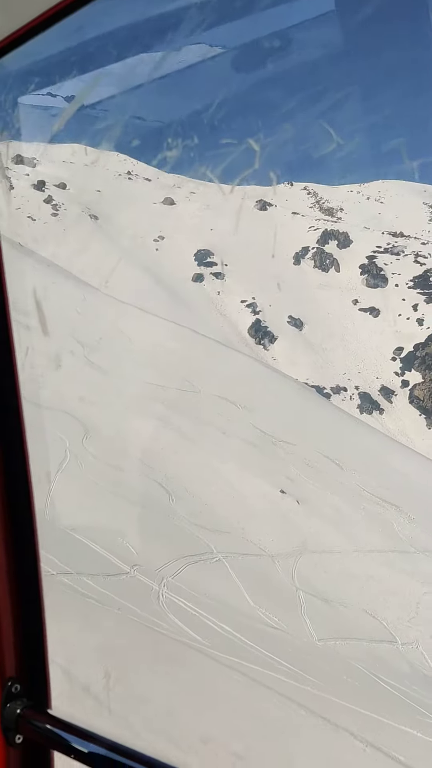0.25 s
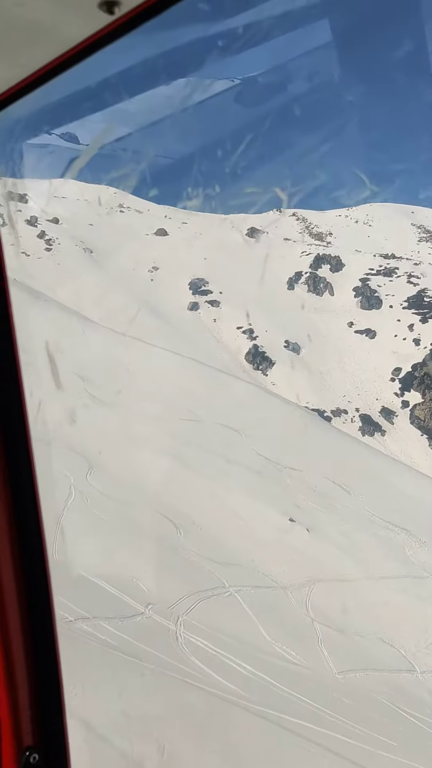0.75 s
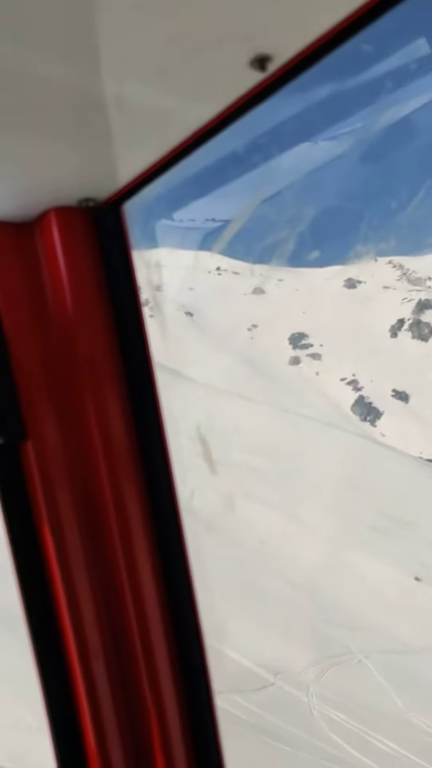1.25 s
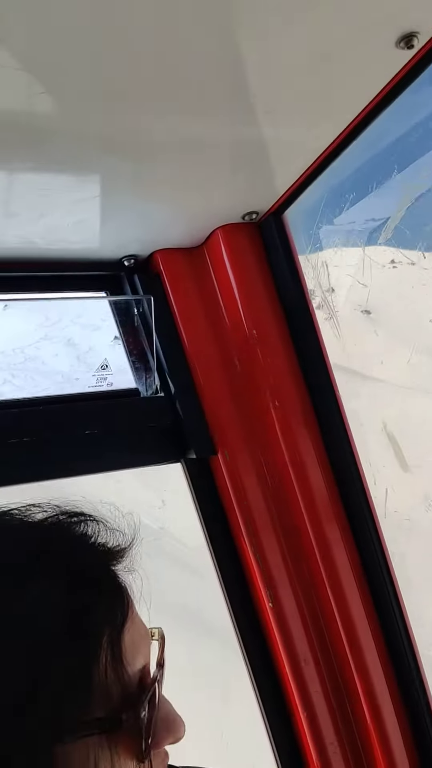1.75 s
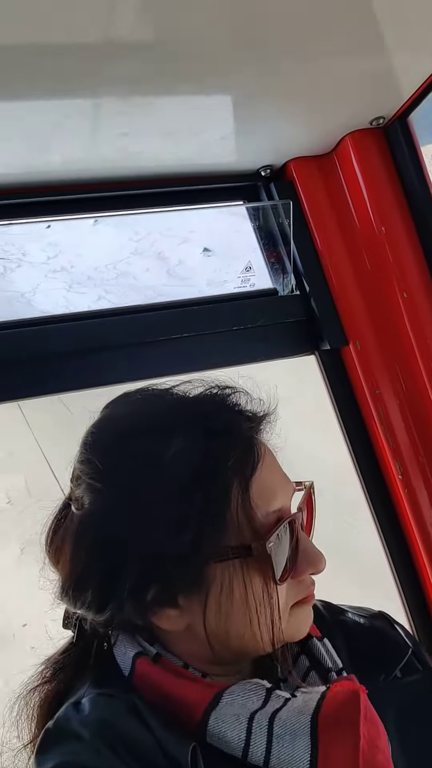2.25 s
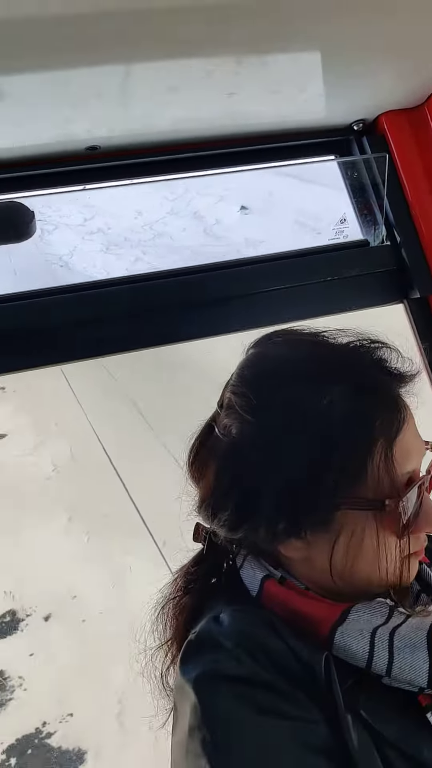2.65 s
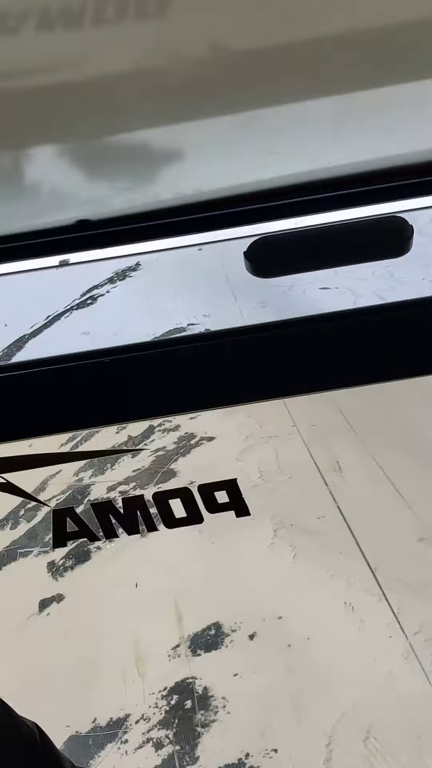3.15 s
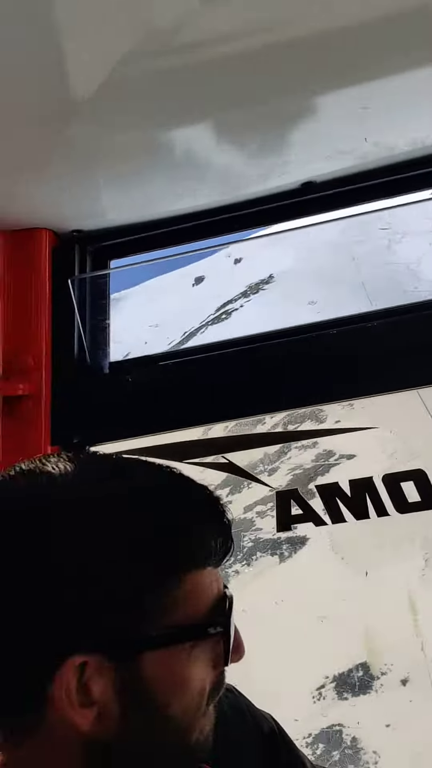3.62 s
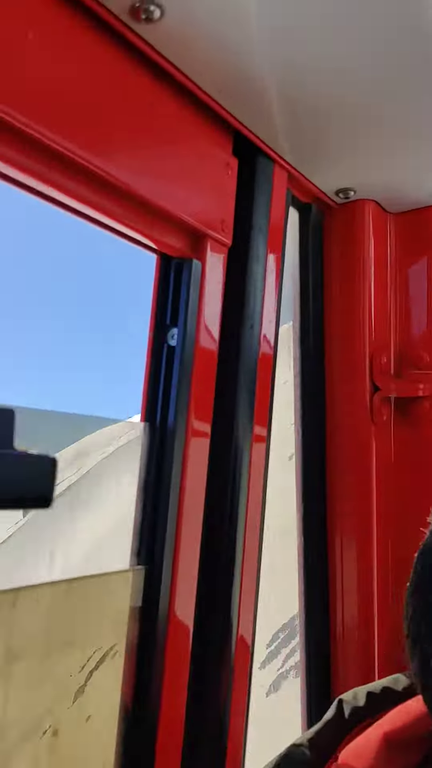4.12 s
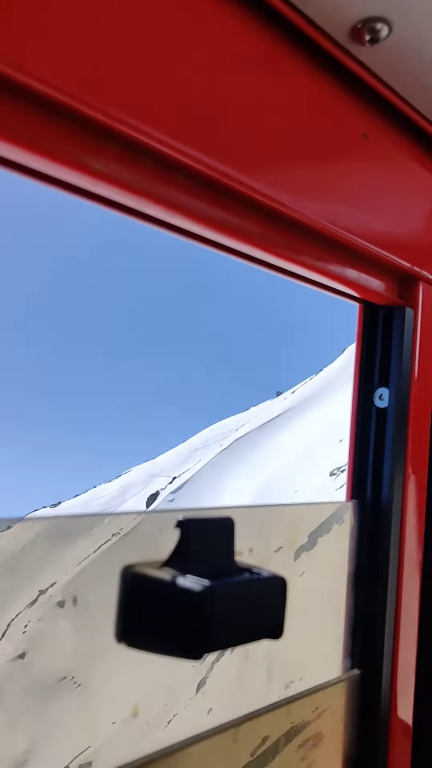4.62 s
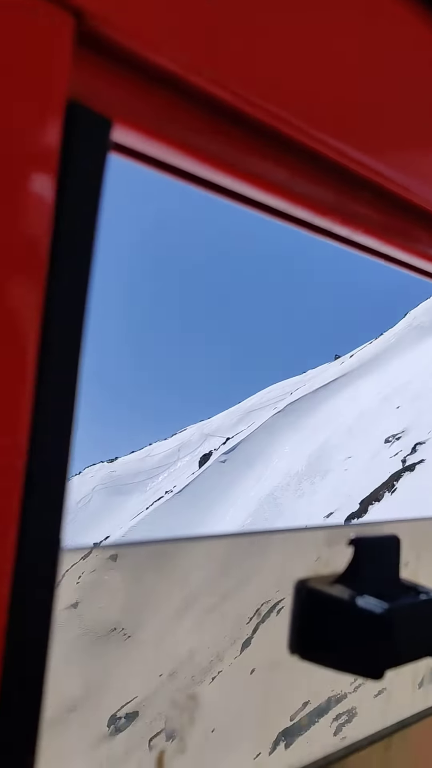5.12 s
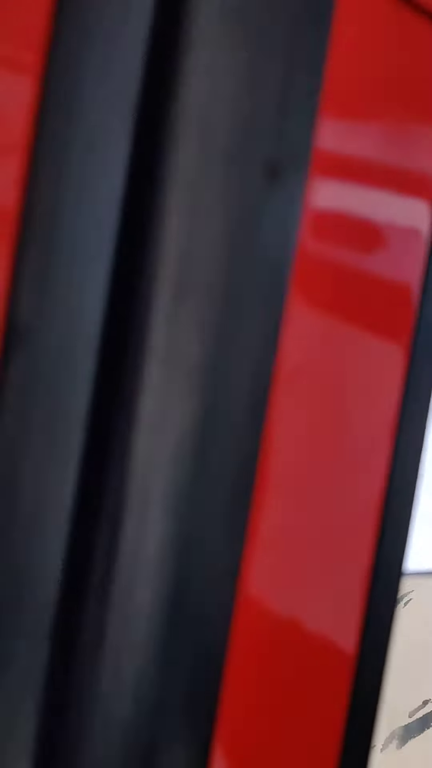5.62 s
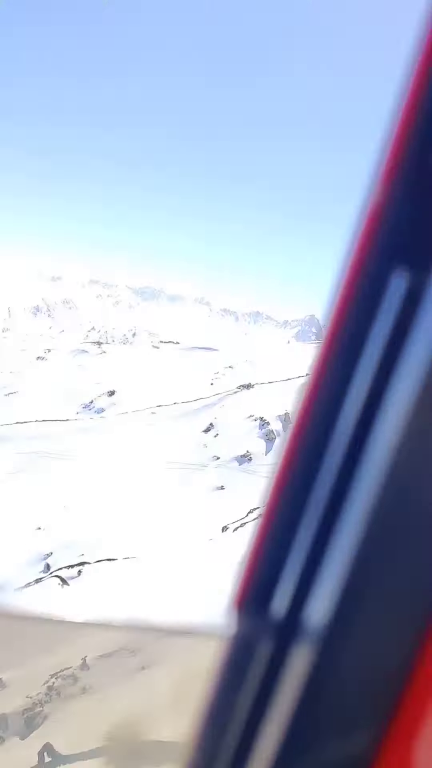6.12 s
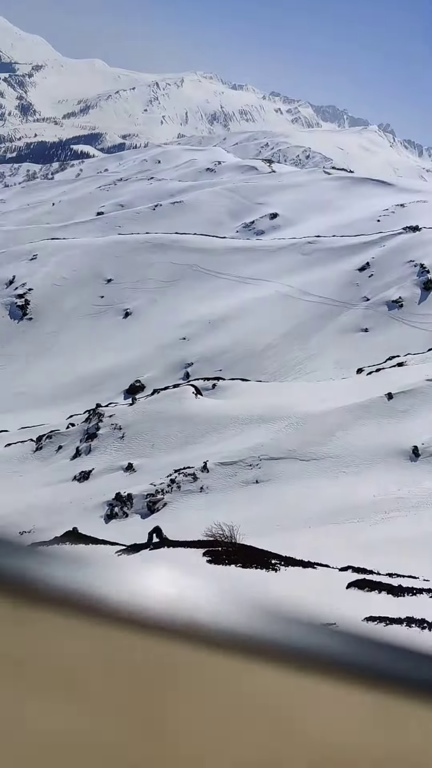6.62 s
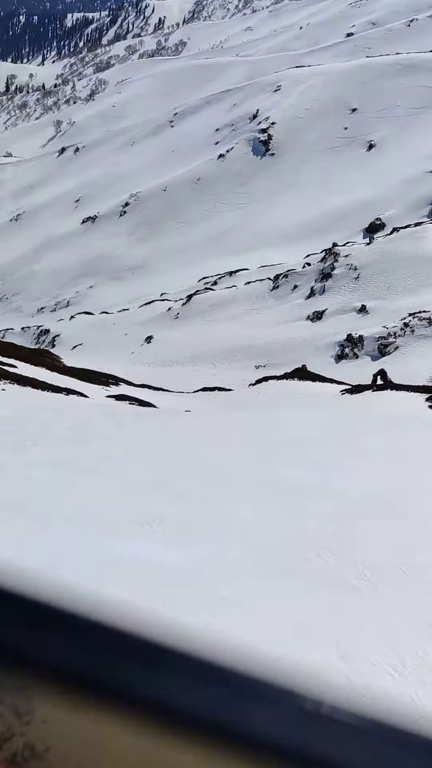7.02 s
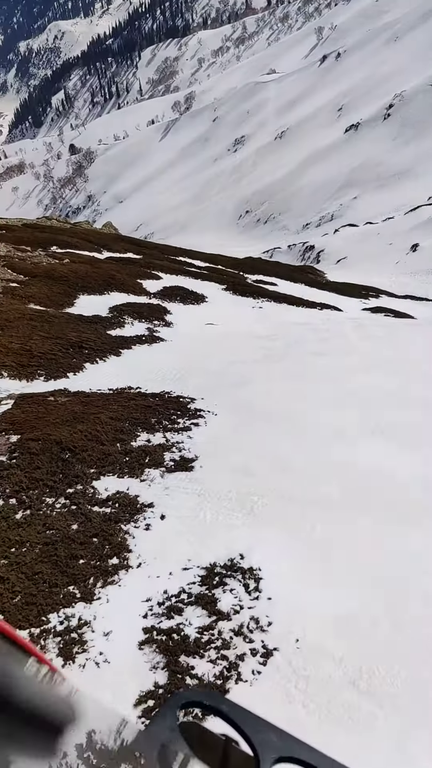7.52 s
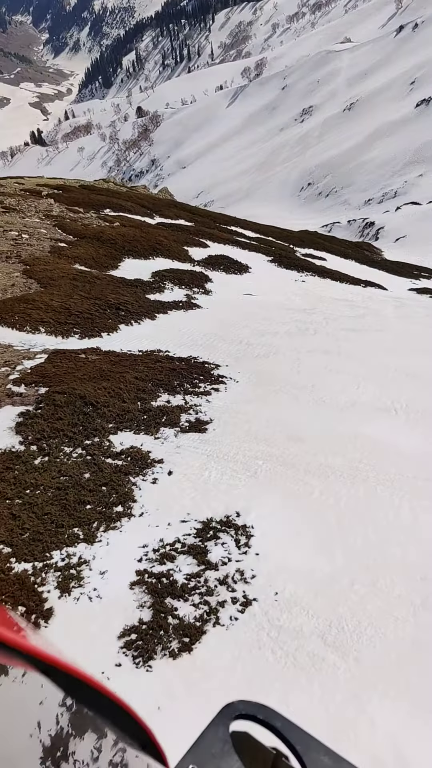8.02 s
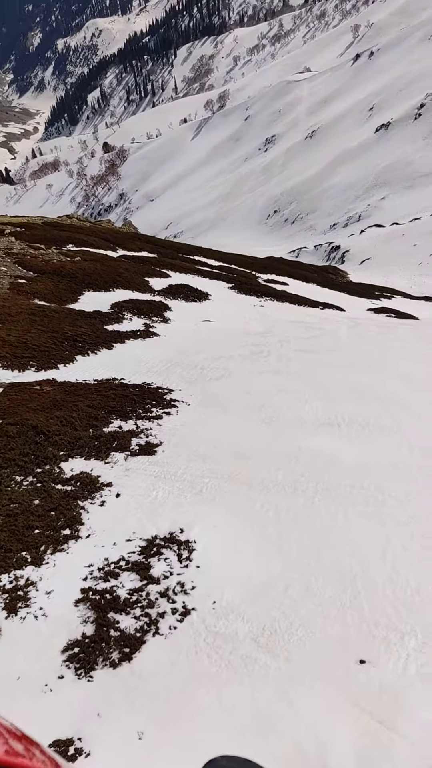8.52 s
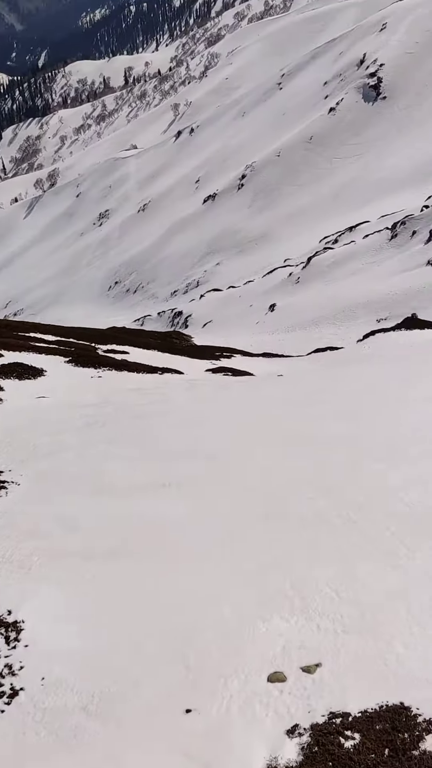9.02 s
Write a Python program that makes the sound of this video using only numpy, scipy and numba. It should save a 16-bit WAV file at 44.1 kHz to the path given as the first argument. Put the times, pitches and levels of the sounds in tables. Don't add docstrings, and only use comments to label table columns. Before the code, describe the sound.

A steady low drone throbs through a small cable car cabin while jackets rustle and tick close by, then wind thumps and a loose pane buzzes.

```python
import sys
import numpy as np
from scipy import signal
from scipy.fft import rfft, irfft, next_fast_len
from scipy.io import wavfile
from scipy.ndimage import uniform_filter1d, minimum_filter1d
from numba import njit

SR = 44100
rng = np.random.default_rng(int(sys.argv[2]) if len(sys.argv) > 2 else 0)


def store_wav(level_fs):
    pcm = np.round(np.clip(np.atleast_2d(level_fs), -1, 1) * 32767)
    wavfile.write(sys.argv[1], SR, pcm.T.astype(np.int16))


def how_loud(loudness_db):
    steps = np.asarray(loudness_db, float) / 20
    return 10 ** steps


N = 408366
T = np.arange(N) / SR
LEFT_RIGHT = np.array([[1], [-1]])


def curve(rows):
    s, *columns = np.transpose(rows)
    return [np.interp(T, s, c) for c in columns]


def slopes(start_s, end_s, rise_db_s, fall_db_s):
    return -rise_db_s * np.maximum(start_s - T, 0) - fall_db_s * np.maximum(T - end_s, 0)


def unit(x):
    return x / np.sqrt(np.mean(x ** 2))


def noise():
    return rng.standard_normal(N)


def colour(x, points):
    size = next_fast_len(N)
    hz, db = np.transpose(points)
    bin_hz = np.arange(size // 2 + 1) * SR / size
    gain = how_loud(np.interp(np.log(bin_hz + 1), np.log(hz), db))
    return irfft(rfft(x, size) * gain, size)[..., :N]


@njit
def moving_ring(x, hz, width):
    y, band, low = np.empty(len(x)), 0., 0.
    for i in range(len(x)):
        g, damping = np.tan(np.pi * hz[i] / SR), width / hz[i]
        v = (band + g * (x[i] - low)) / (1 + g * (g + damping))
        band, low, y[i] = 2 * v - band, low + 2 * g * v, damping * v
    return y


def ring(x, hz, width):
    return moving_ring(x, hz + 0 * T, 1. * width)


def double_ring(x, hz, width):
    return ring(ring(x, hz, width), hz, width)


def walk(rate):
    k = int(SR / rate)
    held = np.repeat(rng.standard_normal(N // k + 1), k)
    return unit(uniform_filter1d(uniform_filter1d(held, k), k)[:N])


def pair(make, likeness):
    c = np.clip(likeness, 0, 1)
    return np.sqrt((1 + c) / 2) * make() + np.sqrt((1 - c) / 2) * make() * LEFT_RIGHT


# time_s, drone level_db, beat_depth (0-1)
GRIP = [(0, -12, 0.27), (0.59, -12, 0.27), (0.76, -6.2, 0.2), (1.11, -8.5, 0.23), (2.39, -9, 0.29),
        (2.64, -2.5, 0.3), (3.14, -7.5, 0.18), (3.36, -6.5, 0.26), (4.34, -9, 0.28), (4.6, -4.5, 0.2),
        (4.83, -10.5, 0.27), (5.37, -9, 0.16), (5.56, -16.5, 0.4), (5.71, -9.5, 0.24), (7.06, -10.0, 0.09),
        (8.36, -12, 0.18), (9.16, -17.5, 0.28), (9.25, -27, 0.01)]
WHEEL_TONES = [(1, 1, 0), (2, .16, 1.63), (-1, .19, -3.12)]


def rope():
    swing = np.cos(2 * np.pi * (T - 4.949) / 4.972)
    strand_hz = 72.911 + 0.584 * swing
    phase = 2 * np.pi * np.cumsum(strand_hz) / SR
    wheel = phase / 27 + 1.752
    grip_db, depth = curve(GRIP)
    tones = sum(share * np.exp(1j * (start - k * wheel)) for k, share, start in WHEEL_TONES)
    return phase, grip_db, 1 + depth * tones


def flutter():
    x = walk(22)
    return 0.7 * unit(x - uniform_filter1d(x, size=SR // 7))


def drone(phase, db, pan_db):
    lag = 0.013 * pan_db * LEFT_RIGHT
    level = np.sqrt(2) * how_loud(db + flutter() + LEFT_RIGHT * pan_db / 2)
    balance = np.cosh(pan_db * np.log(10) / 40)
    return level * np.cos(phase + lag) / balance


# time_s, heading_turns, outside (out of the window, 0-1)
PHONE = [
    (0, 0.2, 0),
    (2.0, 0.17, 0),
    (3.3, 0.31, 0),
    (3.8, 0.39, 0.03),
    (4.7, 0.62, 0.1),
    (5.7, 0.74, 0.15),
    (6.5, 0.83, .35),
    (8.15, 1.15, .9),
    (9.26, 0.93, 1),
]


def phone_swing():
    return curve(PHONE)


# level_db, faced_db (change when faced), bearing_turns,
# outdoors_db (change out of the window), grip_share (share of the grip level followed)
FACING = [
    (-29.5, 6.5, 0.025, -10.5, 0.24),
    (-34, 7.5, 0.96, -2.5, 0.3),
    (-47.5, 10.5, 0.62, 1.5, 0.42),
    (-41.5, -7, 0.51, -5, 0.26),
    (-34.5, 12, .08, -11.5, 0.16),
]


def facing(heading, outside, grip_db):
    mean_grip_db, focus = -9, 1.8
    levels = []
    for db, faced_db, bearing, outdoors_db, share in FACING:
        lobe = (np.cos(np.pi * (heading - bearing)) ** 2) ** focus
        levels.append(db + faced_db * lobe + outdoors_db * outside + share * (grip_db - mean_grip_db))
    return levels


# multiple, level_db (over its panel), width_hz, throb_depth (0-1),
# steady (steady part against wavering part)
OVERTONES = [(2, -4, 9, 0.8, 1.4), (3, -5.5, 10, 0.07, 2.8), (4, 0.5, 12, 0.2, 1.3), (5, -10, 12, 0, 0.78),
             (6, -8, 9, 0.3, 1.3), (7, -23, 28, .2, 0.53)]
# centre_hz, width_hz, level_db (over its panel)
PANELS = [(32.4, 18, 2), (88, 17, -9.5), (132.6, 5, -6.5), (183, 8.1, -8), (226, 5.5, -2.5),
          (260.6, 17, -6.5), (297.2, 13, -3), (469, 39, -7.5), (561, 43, -14.5)]
PANEL_OF = [0, 4, 4, 2, 2, 2, 3, 3, 3]


def panels(phase, panel_db, pan_db):
    out = 0
    throb = np.exp(-2j * np.pi * 5.05 * (T - 7.97))
    for k, db, width, depth, steady in OVERTONES:
        k = round(k)
        swing = np.exp(1j * k * phase) * (1 + depth * throb)
        tone = lambda: np.real((steady + walk(width) + 1j * walk(width)) * swing)
        level = how_loud(db + panel_db[min(k - 1, 3)] + 0.26 * LEFT_RIGHT * pan_db)
        out = out + level * unit(pair(tone, 1.05 - k / 16))
    for (hz, width, db), which in zip(PANELS, PANEL_OF):
        shake = lambda: double_ring(noise(), hz, 1.5 * width)
        out = out + how_loud(db + panel_db[which]) * unit(pair(shake, 1.01 - hz / 1500))
    return out


# hz, level_db (per Hz)
AIR = [(15, -8), (40, -2), (100, -2.5), (200, -15.5), (400, -22.5), (600, -34), (750, -35.5), (1200, -50.5),
       (3000, -69.5)]


def air():
    return how_loud(-32 + 2.0 * walk(5.5)) * unit(colour(pair(noise, 0.64), AIR))


# start_s, end_s, level_db, change_db (by the end), low_db (low hiss minus level)
STROKES = [(0.036, .2, -62.5, 2.5, -1.5), (.2, 0.264, -53, -1, -9), (0.261, 1.074, -55, 0, -3),
           (1.112, 1.362, -56, 1.5, -1.5), (1.346, 1.501, -55.5, 5.5, -2), (1.498, 2.287, -50, -3.5, -3),
           (2.314, 2.679, -46, -11.5, -4), (2.708, 3.021, -57.5, 8, -2.5), (3.012, 3.382, -50, -2.5, -2),
           (3.441, 3.981, -59, 11, -2), (4.043, 4.291, -45.5, -3.5, -2.5),
           (4.295, 4.564, -47.5, -7.5, -3.5), (4.606, 4.655, -49, -1, -6), (4.72, 4.958, -59.5, -1.5, -2.2),
           (5.003, 5.437, -55.5, -11.5, -2.5), (5.644, 6.093, -63, 4.5, -3.2),
           (6.236, 6.316, -60, -1.3, -6), (6.379, 6.521, -63.5, 6.5, -4.5), (6.532, 6.995, -57, 4, -1.5),
           (7.039, 7.117, -47, 1, -9.5), (7.189, 7.564, -54, 0, -2), (7.571, 7.959, -51, -13, -3.5),
           (8.029, 8.847, -59, -3.5, -1)]


def strokes():
    db, low_db = -66 + 0 * T, 1.5 + 0 * T
    for start, end, first, change, low in STROKES:
        now = first + np.interp(T, [start, end], [0, change]) + slopes(start, end, 220, 111)
        low_db[now > db] = low
        db = np.maximum(db, now)
    return db, uniform_filter1d(low_db, size=1500)


HOLLOW_REST_HZ = 1480
# start_s, end_s, from_hz, to_hz, level_db (over the low hiss)
SLIDES = [
    (1.47, 1.9, 1520, 1480, -8),
    (2.98, 3.398, 1240, 1460, -2),
    (3.78, 3.996, 1250, 1480, 3),
    (4.0, 4.24, 1450, 1870, -6),
]


def sleeve():
    hz, db = HOLLOW_REST_HZ + 0 * T, -13.5 + 0 * T
    for start, end, first_hz, last_hz, level in SLIDES:
        now = level + slopes(start, end, 37.5, 37.5)
        hz = np.where(now > db, np.interp(T, [start, end], [first_hz, last_hz]), hz)
        db = np.maximum(db, now)
    return hz * (1 + 0.03 * walk(12)), db + 2.2 * walk(9.9)


def cloth(pan_db):
    db, low_db = strokes()
    hollow_hz, hollow_db = sleeve()
    upper_hz = 2000 + 0.35 * (hollow_hz - HOLLOW_REST_HZ)
    out, scuff_db = np.zeros((2, N)), 0.99 * walk(45)
    for side in range(2):
        grains = noise() * how_loud(2.84 * np.minimum(rng.exponential(size=N), 6))
        for hz in 800 * 2 ** np.arange(0, 4.6, 0.5):
            low_share = np.clip(np.log(4500 / hz) / np.log(2.2), 0, 1)
            band = ring(grains, hz, 0.45 * hz)
            out[side] += how_loud(low_share * (low_db + 2.0) + walk(18)) * band
        hollow = double_ring(unit(grains), hollow_hz, 260)
        hollow += 0.85 * double_ring(unit(grains), upper_hz, 550)
        out[side] = out[side] / np.std(grains) + how_loud(low_db + hollow_db + 5.5) * hollow
    return how_loud(db + 6 + scuff_db + LEFT_RIGHT * (pan_db - 0.5) / 2) * out


# time_s, peak_db, dull_db (dull part minus peak), pan_db (left minus right)
TICKS = [(0.2274, -36.5, -7, -10.5), (0.3079, -36, -15, -1), (0.378, -37, -11, -6.5),
         (0.473, -44, -13.5, -1.5), (2.3023, -23, -13, -3), (2.616, -36, -18.5, -3),
         (3.4957, -36, -25, -7.5), (3.6724, -36.5, -9.5, -1), (4.3875, -35.5, -23, -3),
         (4.4347, -41.5, -8, -5), (4.586, -38, -5.5, -9), (4.8738, -42, -16, -5), (5.266, -39.5, -8, -1.5),
         (5.462, -49, 4, -7), (6.6011, -36.5, -11.5, -9.5), (6.833, -34, -2.5, -7.5),
         (6.8871, -38, 3, -7.5), (6.943, -34, -14.5, -9), (7.0057, -37, -1, -7), (7.0453, -32.5, -10.5, -8),
         (7.3466, -34.5, -22, -11.5), (7.5234, -29, -25, -8), (7.748, -42.5, -13, -12),
         (7.8161, -43.5, -10, -6.5), (7.8232, -30.5, -12, -4), (8.001, -40, -10.5, -1.5),
         (7.8944, -36, -8, -6), (7.9104, -43.5, -22, -10.5), (8.1733, -31, -6.5, -6.5)]


def ticks():
    length = 4000
    out, s = np.zeros((2, N + length)), np.arange(length) / SR
    dull = signal.butter(2, [900, 4200], "band", fs=SR)
    bright = signal.butter(2, 4200, "high", fs=SR)
    peak = lambda x: x / np.abs(x).max(axis=1, keepdims=True)
    decay = np.exp(-s / 0.00046) + 0.36 * np.exp(-s / 0.0067)
    for t, db, dull_db, pan_db in TICKS:
        shared, own = rng.standard_normal(length), rng.standard_normal((2, length))
        crack = (shared + 0.5 * own) * decay
        both = how_loud(7.5) * peak(signal.lfilter(*bright, crack))
        both += how_loud(dull_db + 6.0) * peak(signal.lfilter(*dull, crack))
        i = int(t * SR)
        out[:, i:i + length] += how_loud(db + LEFT_RIGHT * pan_db / 2) * both
    return out[:, :N]


# hz, level_db
PORT_LEFT = [(700, 1), (2200, -1), (4500, -1), (5800, 7), (7000, -5), (8500, -12), (11000, -17),
             (16000, -14.5)]
# hz, level_db
PORT_RIGHT = [(700, -2), (2000, 1.5), (3500, -3), (6000, -3.5), (7300, -1.5), (8800, 3.5), (10000, -3.5),
              (11500, -6), (16000, -9.5)]


def rustle(pan_db):
    left, right = cloth(-2 + 0.49 * pan_db) + ticks()
    return np.array([colour(left, [(300, -32.5)] + PORT_LEFT), colour(right, [(300, -25.0)] + PORT_RIGHT)])


# start_s, length_s, pitch_hz, level_db, pan_db (left minus right)
SQUEAKS = [
    (0.353, 0.019, 3400, -49.5, -14),
    (.354, 0.015, 4250, -52, 0),
    (4.908, 0.014, 3420, -56, -2),
    (5.403, .008, 913, -61, -0.5),
    (7.005, 0.007, 1400, -46, -12),
    (7.968, 0.0077, 2120, -50, -11),
    (8.177, .006, 1430, -55, -10),
]


def squeaks():
    out = 0
    for t, length, hz, db, pan_db in SQUEAKS:
        shape = np.clip(np.minimum((T - t) / 0.0015, 1 - (T - t - length) / 0.004), 0, 1)
        whistle = np.sin(2 * np.pi * hz * T + 1.9 * walk(450))
        out = out + how_loud(db + LEFT_RIGHT * pan_db / 2) * shape * whistle
    return out


# start_s, end_s, level_db, low_db (lower modes), high_db (upper modes)
BUZZ = [(4.655, 4.796, -55, -2, -12), (4.834, 4.895, -57, -7, -8), (4.912, 4.958, -58, 3, -11.5),
        (5.62, 5.768, -57.5, 1.5, -16), (5.813, 5.936, -60.5, 0, -10), (5.994, 6.077, -56.5, -8, -15),
        (8.091, 8.148, -55, 0, -6.5), (8.169, 8.224, -62.5, 11, 5.5), (8.239, 8.413, -57.5, 6.5, 1.5),
        (8.418, 8.575, -58, 7, 1.5), (8.62, 8.655, -64, 10, -2.5), (8.718, 8.824, -59, 7, -0.5),
        (8.929, 8.988, -57.5, 5.5, 1.5), (9.037, 9.125, -62.5, 9, 7.5), (9.129, 9.159, -56.5, 3.5, -1.5),
        (9.194, 9.215, -54, 3, -2), (9.251, 9.3, -34, -3.5, 1)]
# centre_hz, width_hz, left_db, right_db
PANE = [(510, 60, 6.5, 10.5), (1104, 160, 4.5, -17), (1490, 140, -2, -21), (1790, 210, 2.5, -10.5),
        (2130, 94, -9.5, 4.5), (2470, 100, 1.5, -7), (1400, 1100, -4.5, -13.5), (2350, 3600, -4, -5),
        (3200, 260, -6, -1), (4200, 130, -11, -16), (4660, 180, -8, -13.5), (5400, 220, -2.5, -12.5),
        (5760, 120, -5, -13)]


def pane(phase):
    touch, low_db, high_db = np.zeros((3, N))
    for start, end, db, low, high in BUZZ:
        touch += how_loud(db) * np.clip(np.minimum((T - start) / 0.004, 1 - (T - end) / 0.0045), 0, 1)
        since = T > start - 0.01
        low_db[since], high_db[since] = low, high
    cycle = phase / (2 * np.pi)
    gate = np.exp(-(cycle % 1) / 0.7) + 0.7
    knocks = np.diff(np.floor(cycle), prepend=0) * how_loud(1.8 * noise())
    chatter = touch * (unit(noise() * gate) + unit(knocks))
    out = 0
    for hz, width, left_db, right_db in PANE:
        place_db = low_db if hz < 2000 else high_db * hz / 3600 if hz > 2300 else 0
        level = how_loud(place_db + np.array([[left_db], [right_db]]))
        mode = ring(ring(chatter, hz, width), hz, 4.7 * width)
        out = out + level * mode * np.sqrt(60 / width)
    return how_loud(16) * out


# hz, level_db
GUST = [(15, -13), (60, 1), (150, 5), (300, -7), (500, -32.5), (800, -48), (1600, -85)]
# start_s, hold_s, level_db, port (0 left, 1 right)
GUSTS = [
    (7.307, 0.077, -29.5, 0),
    (7.522, .01, -31.5, 0),
    (7.65, 0.0092, -30, 0),
    (8.269, .12, -31, 0),
    (9.042, 0.12, -42, 1),
    (9.25, .05, -38.5, 1),
]


def wind():
    eddies = unit(colour(rng.standard_normal((2, N)), GUST)) * how_loud(2.5 * walk(25))
    gain = np.zeros((2, N))
    for start, hold, db, port in GUSTS:
        gain[round(port)] += how_loud(db + slopes(start, start + hold, 202.5, 152))
    return how_loud(8.0) * eddies * gain


def scene():
    strand_phase, grip_db, beat = rope()
    heading, outside = phone_swing()
    pan_db = -10.5 * outside
    phase = strand_phase + np.angle(beat)
    hum = drone(phase, grip_db + 20 * np.log10(abs(beat)), pan_db)
    hum = hum + panels(strand_phase, facing(heading, outside, grip_db), pan_db)
    return hum + air() + rustle(pan_db) + squeaks() + pane(phase) + wind()


def limit(x):
    gain = np.minimum(1, 0.885 / (np.abs(x).max(axis=0) + 1e-9))
    return x * uniform_filter1d(minimum_filter1d(gain, size=1500), size=1500)


def top_cut(x):
    return signal.sosfilt(signal.butter(12, 15720, fs=SR, output="sos"), x)


def record(dry):
    mix = limit(dry)
    return top_cut(mix)


dry = scene()
out = record(dry)
store_wav(out)
```